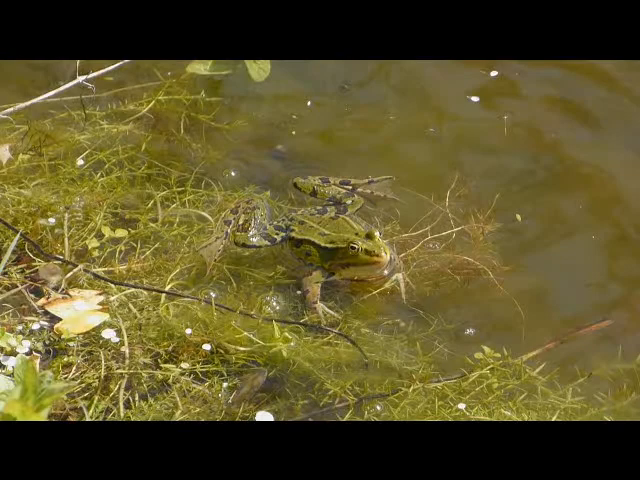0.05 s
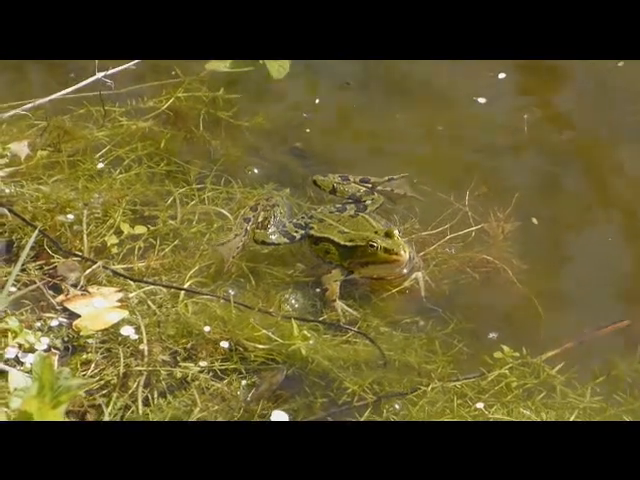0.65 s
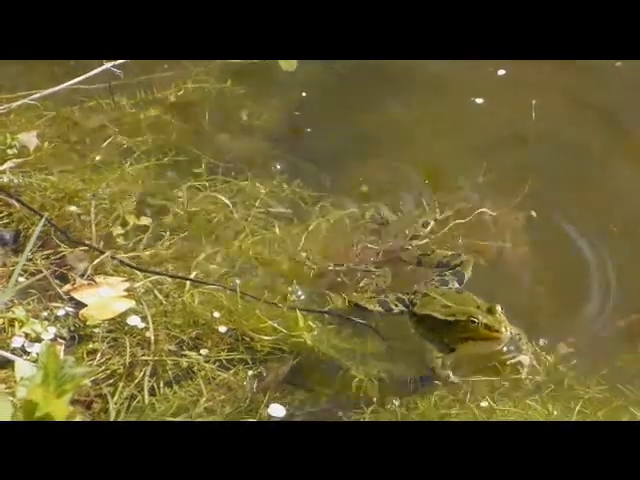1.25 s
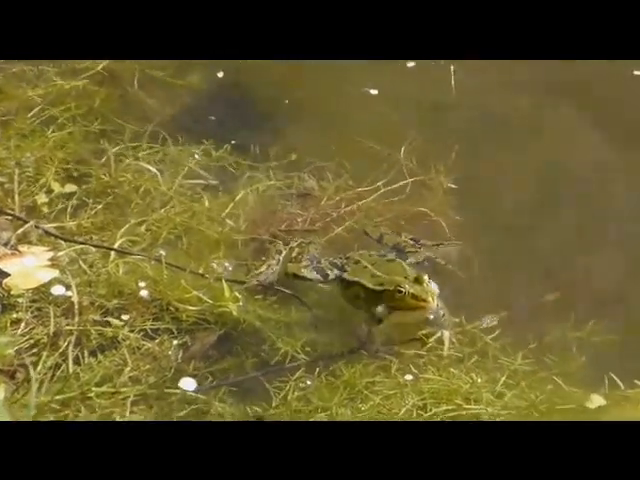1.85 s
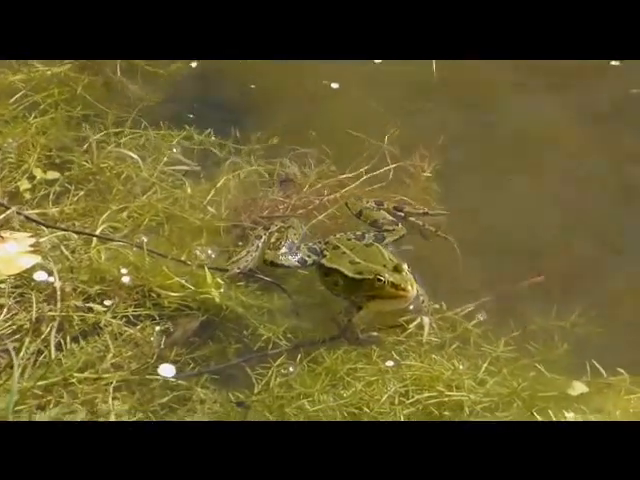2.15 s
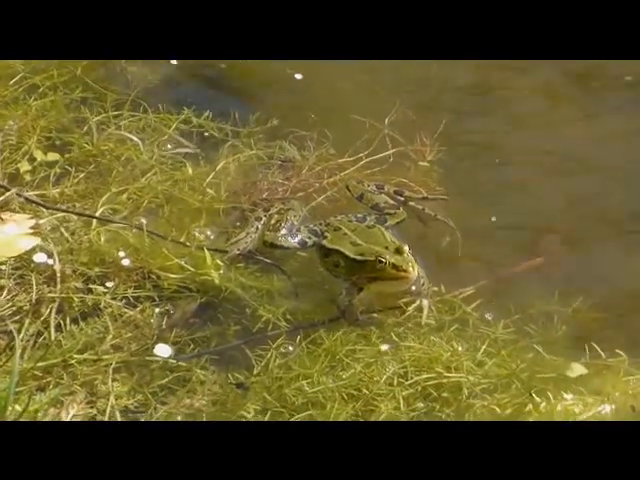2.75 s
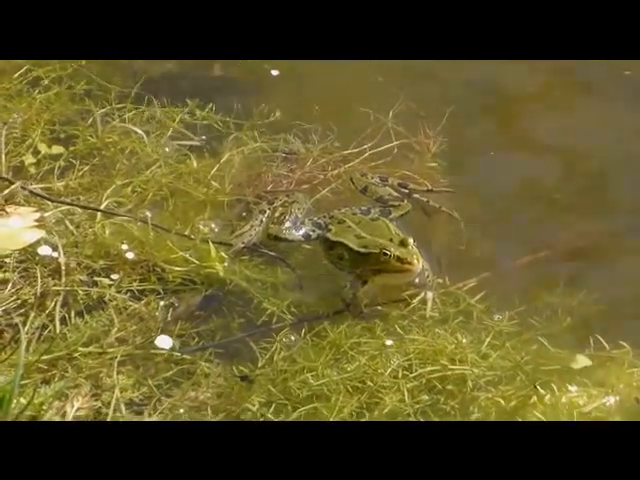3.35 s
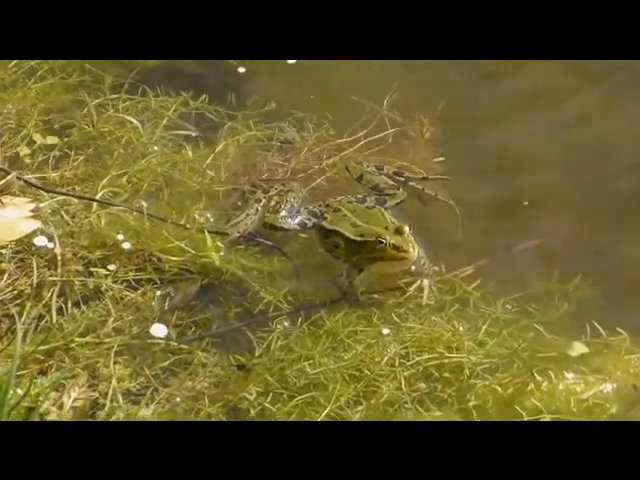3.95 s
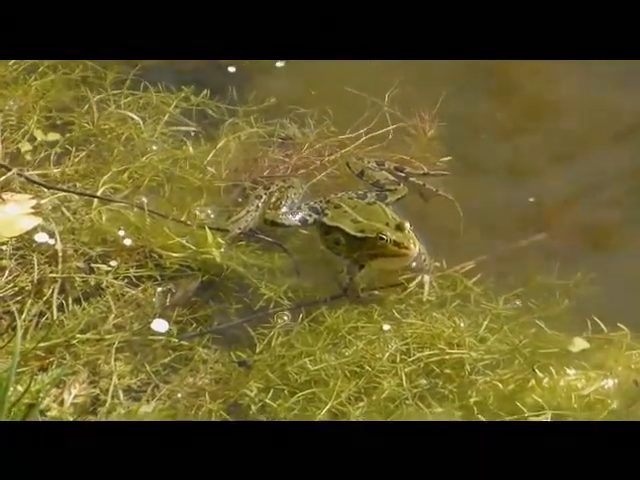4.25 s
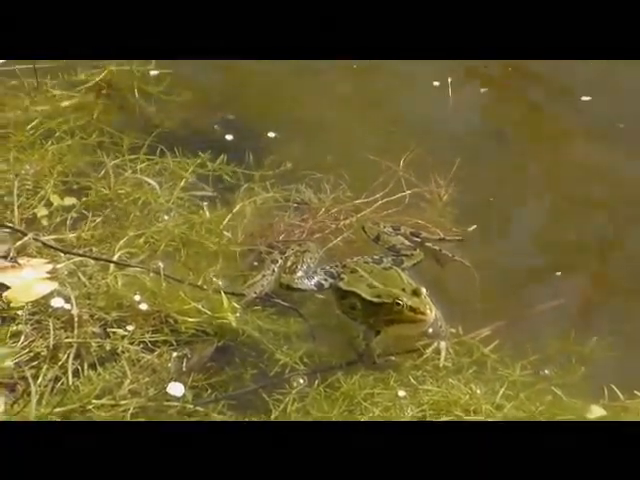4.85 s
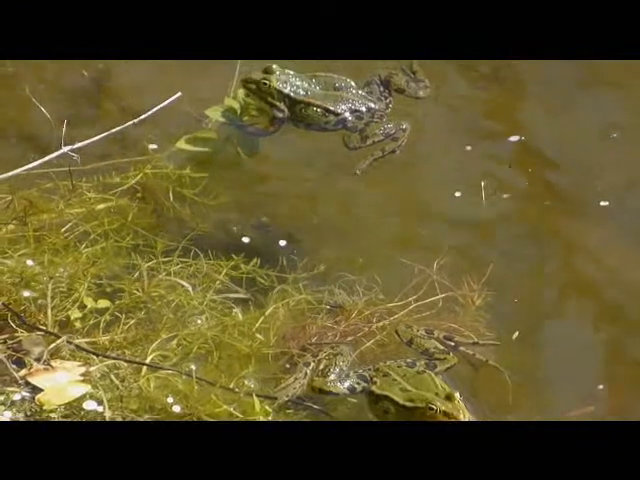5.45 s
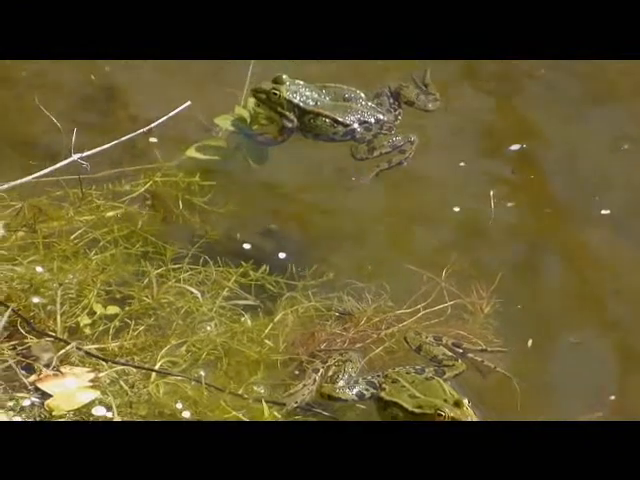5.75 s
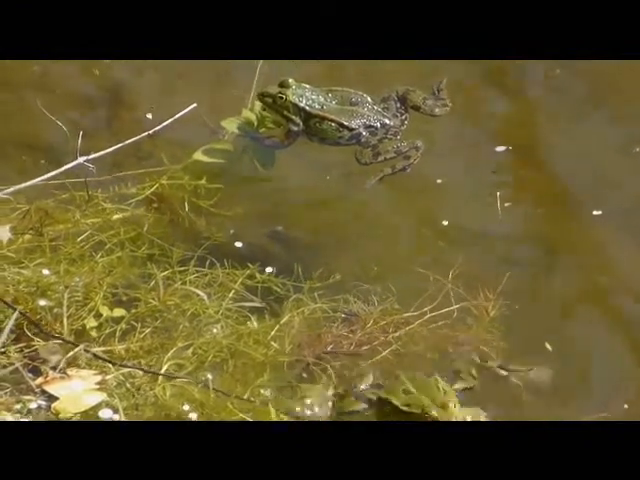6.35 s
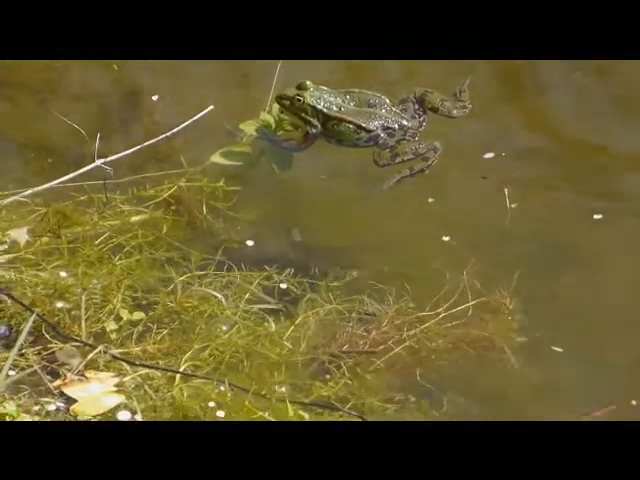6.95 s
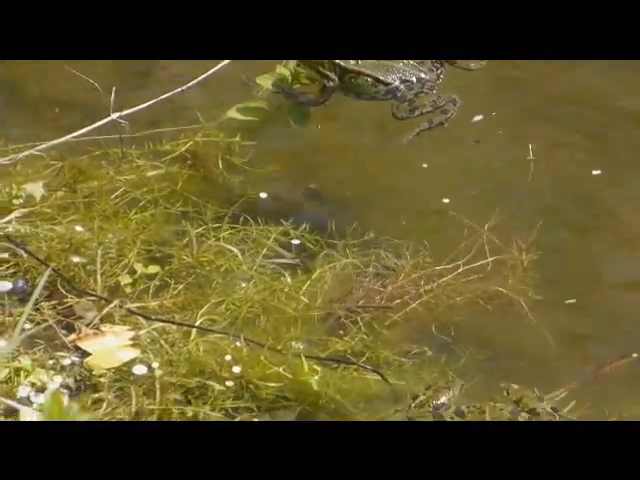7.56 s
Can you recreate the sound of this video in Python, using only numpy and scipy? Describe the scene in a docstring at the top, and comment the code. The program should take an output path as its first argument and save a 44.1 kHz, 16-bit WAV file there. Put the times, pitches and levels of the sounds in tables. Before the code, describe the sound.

Four brief, rasping frog croaks up close, spaced by pauses, with steady low outdoor background noise.

```python
"""Pond frog up close

A frog croaks four times, each croak a train of larynx pulses ringing its throat, vocal sacs and mouth.
The first three swell, throb, then slow into loose clicks; the fourth is still going as the scene ends.
Weeds and banks answer faintly. Behind: an outdoor hush, soft low bumps, a distant bird, faint rustles."""
import sys
import numpy as np
from scipy import signal
from scipy.fft import rfft, irfft, next_fast_len
from scipy.io import wavfile
from scipy.ndimage import uniform_filter1d

SR = 44100
rng = np.random.default_rng(int(sys.argv[2]) if len(sys.argv) > 2 else 0)


def generate_wav(signal):
    """Clip the signal to [-1, 1] and save it as 16-bit WAV at the path in sys.argv[1]."""
    frames = np.transpose(np.atleast_2d(signal))
    scaled = np.clip(frames, -1, 1) * 32767
    pcm = np.round(scaled).astype(np.int16)
    wavfile.write(sys.argv[1], SR, pcm)


N = 339129

# Fader moves of the hush, before trim: t/s, murmur level/dB, hiss level/dB
HUSH_FADERS = [(0, -55, -61.5), (.7, -52, -59.5), (1.4, -52.5, -59.5), (3.9, -52, -59), (4.5, -55.5, -62),
               (5.2, -54.5, -61.5), (6.85, -55, -62.5), (7.69, -53.5, -61.5)]
# Tone of the low murmur: f/Hz, level/dB
MURMUR_EQ = [(18, -52), (30, -39), (49, -25), (64, -23), (89, -13), (106, -8), (174, -6.5), (315, -0.5),
             (500, -2.5), (569, -5), (765, -3), (1260, -8.5), (2500, -15.5), (3250, -28), (5500, -120)]
# Tone of the fine hiss: f/Hz, level/dB
HISS_EQ = [(1500, -16), (2300, -4.5), (4000, -5), (6000, -8.5), (9000, -12.5), (13000, -18.5)]
# Stereo image of the hush: f/Hz, left-right correlation
HUSH_CORRELATION = [(30, .7), (125, 0.95), (300, 1), (1500, 0.52), (4000, 0.55), (8000, 0.44),
                    (12000, 0.53)]
# Pitch contour, one list per croak: t/s, base pulse rate/Hz, thin ring f/Hz
CROAK_CONTOURS = [
    [(.69, 260, 5500), (.765, 221, 5500), (.79, 137, 5560), (.907, 84, 4000)],
    [(4.07, 139, 5400), (4.15, 335, 5400), (4.21, 311, 5330), (4.275, 298, 5200), (4.37, 188, 5180),
     (4.442, 182, 4820)],
    [(6.41, 211, 5500), (6.48, 289, 5700), (6.55, 218, 4550), (6.61, 220, 4520), (6.645, 115, 4400),
     (6.686, 76, 3950)],
    [(7.42, 151, 6000), (7.46, 191, 6000), (7.55, 355, 6040), (7.585, 280, 5420), (7.76, 230, 4700)],
]
# Voicing per croak: half swollen after/s, swell time/s, full level/dB, last push/dB, release/dB,
# sacs half full after/s, full sac f/Hz, sac width/Hz, throat f/Hz,
# then base levels against the full sacs: throat/dB, rasp/dB, thin ring/dB
CROAK_VOICINGS = [(0.1, 0.041, -22.5, 7, -4, 0.13, 1170, 286, 470, -15, -23.5, -20),
                  (0.089, 0.065, -21, 4.5, -19.5, 0.084, 1525, 420, 530, -13, -11, -14),
                  (0.075, 0.023, -29.5, 13.5, 3, .090, 1190, 270, 523, -16.5, -20, -16.5),
                  (0.081, 0.028, -37.5, 0, 3, 0.12, 1490, 610, 540, -11, -6, -10.5)]
# The flanks pump at an even beat, ever harder towards the end of a croak:
# last push t/s, gap/s, pushes, extra pulse rate in the last/Hz, share of that kept per push back
FLANK_THROBS = [(.8872, .0424, 4, 160, .63), (4.4294, .035, 4, 105, .71), (6.6675, .0354, 2, 235, .34)]
# Upper mouth resonances, the rasp: f/Hz, width/Hz, relative level/dB
MOUTH_MODES = [(2210, 630, 1), (2480, 420, -6), (3140, 1620, -9)]
# Loose clicks as the pressure runs out: t/s, dry peak level/dB
LOOSE_CLICKS = [(0.9179, -19.5), (4.4456, -16), (4.4661, -19.5), (6.6947, -14), (6.7063, -17),
                (6.7147, -16.5), (6.7324, -18.5)]
# Send to the weeds and banks: f/Hz, level/dB
SEND_EQ = [(500, 8.5), (1200, -3.5), (1800, 0.5), (3000, 4.0), (5000, 6.5)]
# Placement of the frog: f/Hz, left over right/dB
FROG_PAN = [(400, -0.29), (1200, -0.9), (2400, -3.0), (5000, 1.5)]
# Reverb off the banks: f/Hz, time to fall 60 dB/s
BANK_DECAY = [(300, 0.2), (1600, 0.5), (6000, 0.32)]
# Soft bumps: centre t/s, level/dB, swell width/s
SOFT_BUMPS = [(1.779, -54, .05), (2.312, -50.5, .02), (2.888, -53, .035), (3.206, -51, 0.028),
              (3.484, -57, 0.039), (3.834, -47.5, 0.019), (4.151, -47.5, 0.029), (4.431, -52, 0.034),
              (5.35, -51.5, 0.039), (5.636, -51, 0.034), (6.239, -54, 0.032), (7.112, -50.5, 0.05),
              (7.348, -51.5, 0.047), (7.499, -52, 0.053)]
# Tone of a bump: multiple of its pitch, level/dB
BUMP_EQ = [(.25, -37), (.5, -11), (.75, 2.5), (1.2, -0.5), (2, -7.0), (4, -11), (12, -21.5), (50, -43.5)]
# Distant whistles: t/s, length/s, start f/Hz, end f/Hz, level/dB
BIRD_NOTES = [(3.10, 0.091, 2520, 2550, -61), (3.357, 0.13, 2400, 2060, -58), (3.708, .08, 3070, 3130, -58)]
# Rustles in the weeds: centre t/s, level/dB, centre f/Hz
WEED_RUSTLES = [(3.165, -62, 1400), (3.45, -50.5, 1050)]

START_S, ONSET_DB = 0.0099, -54  # the larynx gets going; the floor a croak swells from
FLUTTER_HZ, FLUTTER_DEPTH_HZ = 33, 14  # fluttering air pressure wobbles the pulse rate
FILL_S, SLACK_SAC_HZ = 0.024, 810  # how fast the sacs fill; their pitch while empty
THROAT_SLACK_DB, RASP_SLACK_DB, RING_SLACK_DB = -2, -22, -15  # empty sacs sound throaty and dull
RASP_GROWS_DB_PER_S, RING_GROWS_DB_PER_S = 24, 69  # a croak brightens towards its end
PUSH_S, PUSH_BUILD = .0065, 0.73  # width of a push; its share of the next one's dB
PUSH_PURITY = 0.32  # share of a push's gain that goes to the sacs alone
TIGHTEN, TIGHTEN_S = 0.073, 0.052  # the sacs stretch at the last, rising by this share of their pitch
RELEASE_S, RELEASE_THROAT_DB = 0.0078, 12.5  # at the end the sacs fade and the throat takes over


def amp(db):
    """Decibels to gain."""
    return 10 ** (np.asarray(db) / 20)


def unit(x):
    """x at rms 1."""
    return x / np.sqrt(np.mean(x ** 2) + 1e-20)


def along(points, hz):
    """Read (f, value) points on a log frequency axis."""
    f, v = np.transpose(points)
    return np.interp(np.log(hz + 1), np.log(f + 1), v)


def curves(rows, t):
    """Automation: each column after the time, read at the times t."""
    s, *cols = np.transpose(rows)
    return [np.interp(t, s, c) for c in cols]


def bell(t, centre, width):
    """A smooth swell of height 1."""
    return np.exp(-.5 * ((t - centre) / width) ** 2)


def rise(t, centre, width):
    """A smooth step from 0 to 1."""
    return .5 + .5 * np.tanh((t - centre) / (2 * width))


def filtered(x, response):
    """Zero-phase EQ with the gain response(hz)."""
    size = next_fast_len(N + SR // 2)
    return irfft(rfft(x, size) * response(np.fft.rfftfreq(size, 1 / SR)), size)[..., :N]


def add(track, s, sound):
    """Mix a sound into the track from time s."""
    part = track[round(s * SR):][:len(sound)]
    part += sound[:len(part)]


def rush(eq, patchy_db):
    """Stereo noise of rms 1 with faint patches of random gain."""
    bins = signal.stft(rng.standard_normal((2, N)), nperseg=512)[2]
    patches = uniform_filter1d(rng.standard_normal(bins.shape[1:]), size=5, axis=0)
    patches = uniform_filter1d(patches, size=14, axis=1)
    pair = signal.istft(bins * amp(patchy_db * unit(patches)), nperseg=512)[1][:, :N]
    spread = lambda hz: np.arccos(along(HUSH_CORRELATION, hz)) / 2
    mid, side = filtered(pair, lambda hz: amp(along(eq, hz)) * [np.cos(spread(hz)), np.sin(spread(hz))])
    return unit(np.array([mid + side, mid - side]))


def hush():
    """The outdoor bed: a low murmur and a fine hiss."""
    murmur_db, hiss_db = curves(HUSH_FADERS, np.arange(N) / SR)
    murmur = amp(murmur_db + 1) * rush(MURMUR_EQ, patchy_db=1.2)
    hiss = amp(hiss_db - 0.5) * rush(HISS_EQ, patchy_db=1.0)
    return murmur + hiss


def larynx_pulse(sac_hz, sac_width_hz, throat_hz, ring_hz, ring_width_hz, throat_db, rasp_db, ring_db):
    """One snap of the larynx ringing throat, sacs and mouth; energy 1."""
    size = 1024
    hz = np.fft.rfftfreq(size, 1 / SR) + 1
    peak = lambda f, width, db: amp(db) ** 2 / (1 + ((hz - f * f / hz) / width) ** 2) ** 2.54
    throat = peak(throat_hz, 254, throat_db + 1)
    sacs = peak(sac_hz, sac_width_hz, 0) + peak(0.76 * sac_hz, 780, -10)
    rasp = sum(peak(f, width, rasp_db + db) for f, width, db in MOUTH_MODES)
    ring = peak(ring_hz, ring_width_hz, ring_db) + peak(1.36 * ring_hz, 902, ring_db - 17)
    # A small body radiates little bass, and above the thin ring only its overtone is left.
    power = (throat + sacs + rasp) / ((1 + (320 / hz) ** 7) * (1 + (hz / ring_hz) ** 20))
    power += ring / (1 + (hz / 6000) ** 18)
    # Minimum phase: a hard attack, then the resonances die away.
    cepstrum = irfft(np.log(power + 1e-9) / 2)
    cepstrum[1:size // 2] *= 2
    cepstrum[size // 2 + 1:] = 0
    wave = irfft(np.exp(rfft(cepstrum)))
    return wave / np.linalg.norm(wave)


def throb(t):
    """The flanks push: extra pulse rate and push strength (0-1)."""
    rate, strength = np.zeros(len(t)), np.zeros(len(t))
    for last_s, gap_s, count, extra_rate, share in FLANK_THROBS:
        for k in range(count):
            push = bell(t, last_s - k * gap_s, PUSH_S)
            rate += extra_rate * share ** k * push
            strength += PUSH_BUILD ** k * push
    return rate, strength


def croak(contour, voicing, scatter_db):
    """Pressure swells, the sacs fill and rise in pitch, then give way to the throat."""
    (swell_s, swell_width_s, full_db, last_push_db, release_db, filled_s,
     full_hz, sac_width_hz, throat_hz, full_throat_db, full_rasp_db, last_ring_db) = voicing
    t = np.arange(int(contour[0][0] * SR), int(contour[-1][0] * SR)) / SR
    age, left = t - t[0], t[-1] - t
    slack = 1 - rise(age, filled_s, FILL_S)
    release = np.exp(-left / RELEASE_S)
    base_rate, ring_hz = curves(contour, t)
    push_rate, push = throb(t)
    flutter = FLUTTER_DEPTH_HZ * np.sin(2 * np.pi * (FLUTTER_HZ * t + rng.random()))
    rate = base_rate + push_rate + flutter
    level_db = ONSET_DB + (full_db - ONSET_DB) * rise(age, swell_s, swell_width_s)
    level_db += last_push_db * push + release_db * release
    stretch = 1 + TIGHTEN * np.exp(-left / TIGHTEN_S)
    sac_hz = (full_hz + (SLACK_SAC_HZ - full_hz) * slack) * stretch
    duck_db = PUSH_PURITY * last_push_db * push
    throat_db = full_throat_db + (THROAT_SLACK_DB - full_throat_db) * slack - duck_db
    throat_db += RELEASE_THROAT_DB * release
    rasp_db = full_rasp_db + RASP_SLACK_DB * slack - RASP_GROWS_DB_PER_S * left - duck_db
    ring_db = last_ring_db + RING_SLACK_DB * slack - RING_GROWS_DB_PER_S * left - duck_db
    snaps = np.flatnonzero(np.diff(np.floor(np.cumsum(rate) / SR)))  # one per larynx cycle
    # Weak pulses have the loosest timing.
    jitter_s = np.interp(level_db - level_db.max(), [-32, -22, -10, -3], [.0004, .00011, .00006, .00004])
    attack = 1 - np.exp(-age / START_S)
    voice = np.zeros(N)
    for i, (late, strong, tight, harsh, squeak) in zip(snaps, rng.standard_normal((len(snaps), 5))):
        wave = larynx_pulse(sac_hz[i] * (1 + .01 * tight), sac_width_hz, throat_hz,
                            ring_hz[i] * (1 + .018 * squeak), ring_width_hz=355, throat_db=throat_db[i],
                            rasp_db=rasp_db[i] + harsh, ring_db=ring_db[i] + 1.3 * harsh)
        gain = amp(level_db[i] + scatter_db * strong) * np.sqrt(SR / rate[i]) * attack[i]
        add(voice, t[i] + jitter_s[i] * late, gain * wave)
    return voice


def weeds(send, t60_s=0.046):
    """Nearby weeds and stems scatter each pulse for a few milliseconds."""
    t = np.arange(round(0.02 * SR)) / SR
    scatter = rng.standard_normal(len(t)) * amp(-60 * t / t60_s) * (t > .001)
    return signal.fftconvolve(send, scatter / np.linalg.norm(scatter))[:N]


def banks(send, predelay_s=.004, width=0.4):
    """A thin scattered answer from the banks, different in each ear."""
    hz, t, bins = signal.stft(rng.standard_normal((2, SR // 2)), SR, nperseg=256)
    decay = amp(-60 * t / along(BANK_DECAY, hz)[:, None])
    mid, side = signal.istft(bins * decay, SR, nperseg=256)[1]
    tail = np.array([mid + width * side, mid - width * side]) / np.linalg.norm(mid)
    delayed = np.pad(send, (round(predelay_s * SR), 0))
    return signal.fftconvolve(delayed[None], tail, axes=1)[:, :N]


def clicks():
    """Lone pulses close to the pitches of their croak, ringing only briefly in the slack sacs."""
    track = np.zeros(N)
    croak_starts = [contour[0][0] for contour in CROAK_CONTOURS]
    for s, db in LOOSE_CLICKS:
        k = np.searchsorted(croak_starts, s) - 1
        sac_hz, _, throat_hz = CROAK_VOICINGS[k][6:9]
        ring_hz = CROAK_CONTOURS[k][-1][-1]
        wave = larynx_pulse(1.07 * sac_hz, sac_width_hz=600, throat_hz=throat_hz, ring_hz=.97 * ring_hz,
                            ring_width_hz=190, throat_db=1.1, rasp_db=-13.5, ring_db=-16)
        add(track, s, wave * amp(db) / np.abs(wave).max())
    return track


def bumps(pitch_hz=169.4):
    """Short dull swells of noise around one low pitch."""
    track = np.zeros(N)
    t, hz = np.arange(SR // 2) / SR, np.fft.rfftfreq(SR // 2, 1 / SR)
    tone = amp(along(BUMP_EQ, hz / pitch_hz))
    for s, db, width_s in SOFT_BUMPS:
        rumble = unit(irfft(rfft(rng.standard_normal(len(t))) * tone))
        add(track, s - t.mean(), amp(db) * bell(t, t.mean(), width_s) * rumble)
    return track


def bird():
    """Short gliding whistles from far away."""
    song = np.zeros(N)
    for s, length_s, start_hz, end_hz, db in BIRD_NOTES:
        hz = np.linspace(start_hz, end_hz, round(length_s * SR))
        whistle = np.sin(2 * np.pi * np.cumsum(hz) / SR)
        add(song, s, amp(db) * np.hanning(len(hz)) * whistle)
    return song


def rustles(width_s=.01, width_octaves=0.83):
    """The weeds rustle in brief soft puffs of midrange noise."""
    t = np.arange(N) / SR
    track = np.zeros(N)
    for s, db, centre_hz in WEED_RUSTLES:
        band = lambda hz: bell(np.log2((hz + 1) / centre_hz), 0, width_octaves)
        track += amp(db) * bell(t, s, width_s) * unit(filtered(rng.standard_normal(N), band))
    return track


def scene():
    """The frog sits up front, slightly right of centre; weeds and banks return it with scooped mids."""
    croaks = sum(croak(contour, voicing, scatter_db=1.62)
                 for contour, voicing in zip(CROAK_CONTOURS, CROAK_VOICINGS))
    frog = croaks + clicks()
    send = filtered(frog, lambda hz: amp(along(SEND_EQ, hz)))
    near = frog + amp(-14) * weeds(send)
    panned = filtered(near, lambda hz: amp([along(FROG_PAN, hz) / 2, -along(FROG_PAN, hz) / 2]))
    background = (hush() + bumps() + bird() + rustles()) * amp([[-.3], [.3]])  # a touch to the right
    return panned + amp(-21.5) * banks(send) + background


def record(dry):
    """Camera tone: a narrow treble notch and a hard high cut, with a 3 ms fade-out."""
    notch = lambda hz: 1 - .95 * bell(hz, centre=9100, width=200)
    fade = np.minimum(np.arange(N)[::-1] / (.003 * SR), 1)
    return filtered(dry * fade, lambda hz: notch(hz) * (hz < 13000))


dry = scene()
out = record(dry)
generate_wav(out)
```